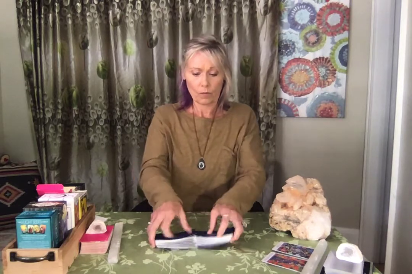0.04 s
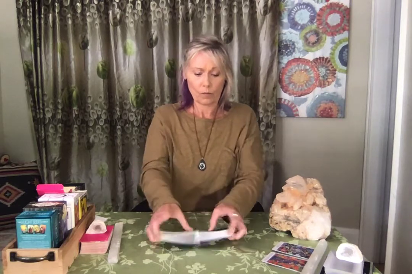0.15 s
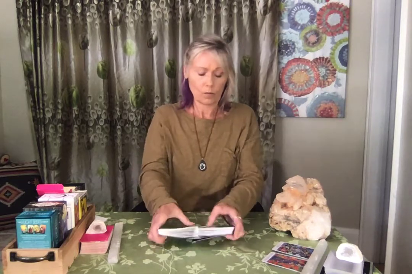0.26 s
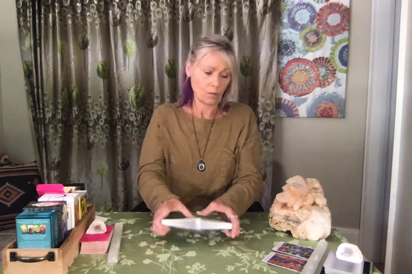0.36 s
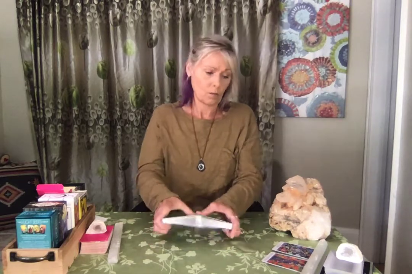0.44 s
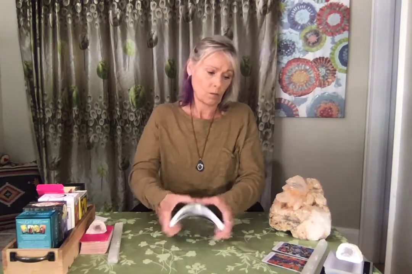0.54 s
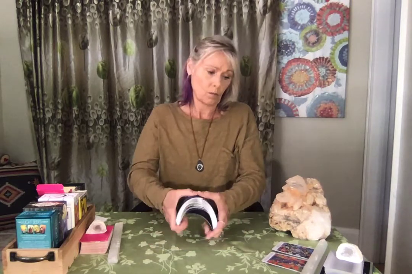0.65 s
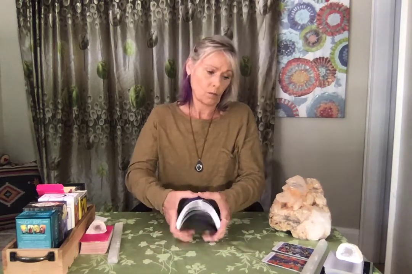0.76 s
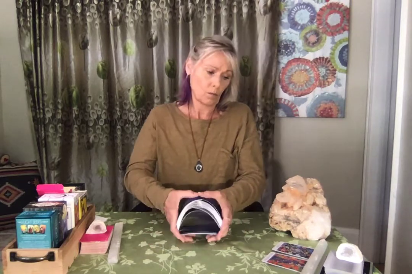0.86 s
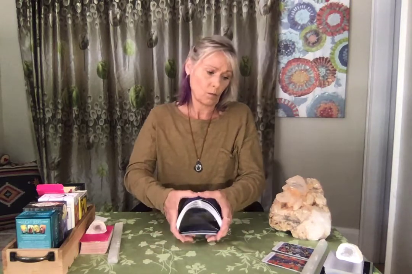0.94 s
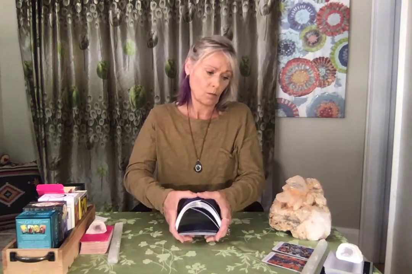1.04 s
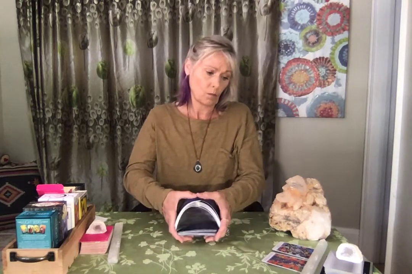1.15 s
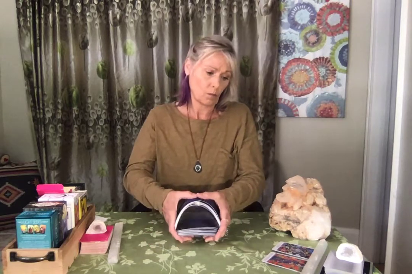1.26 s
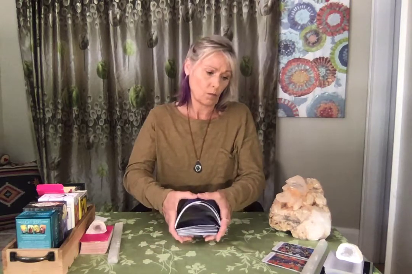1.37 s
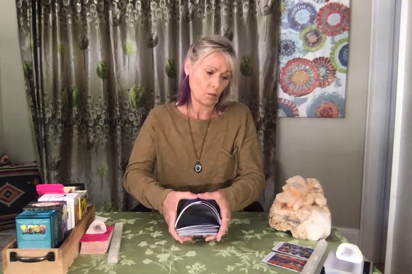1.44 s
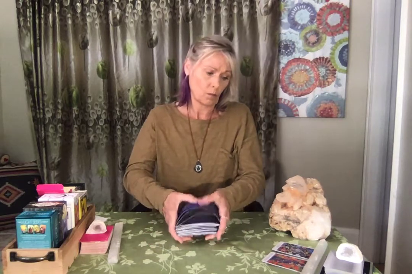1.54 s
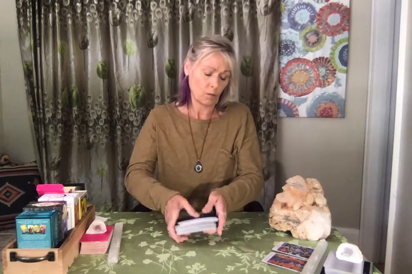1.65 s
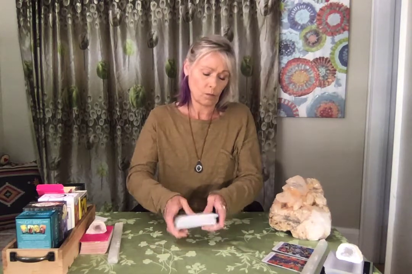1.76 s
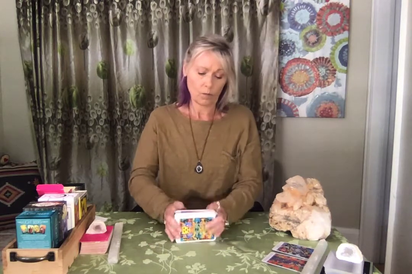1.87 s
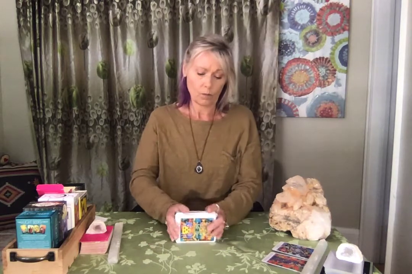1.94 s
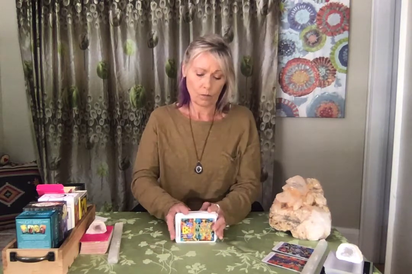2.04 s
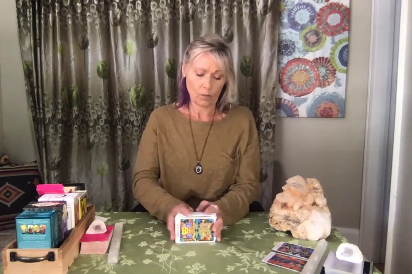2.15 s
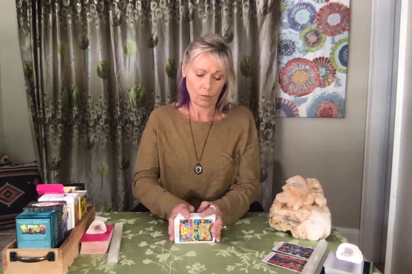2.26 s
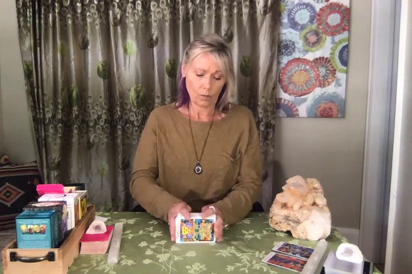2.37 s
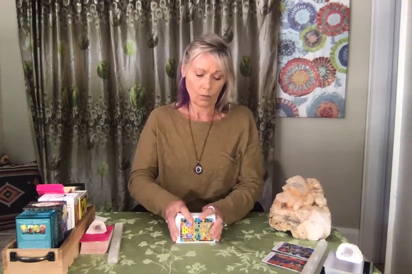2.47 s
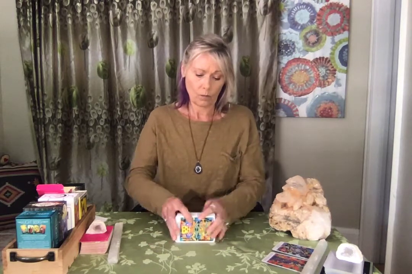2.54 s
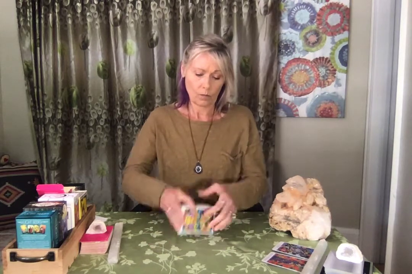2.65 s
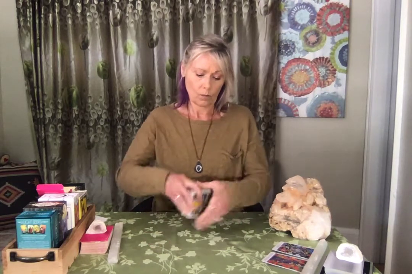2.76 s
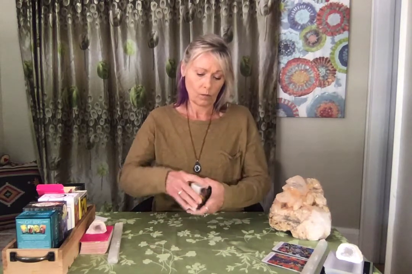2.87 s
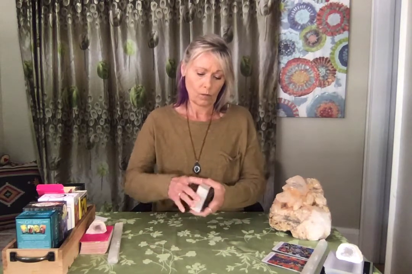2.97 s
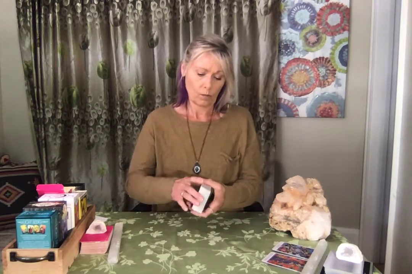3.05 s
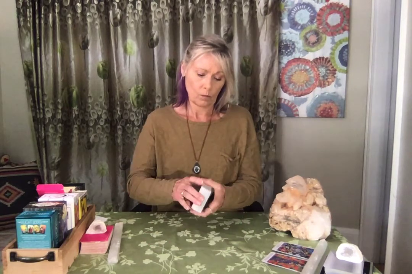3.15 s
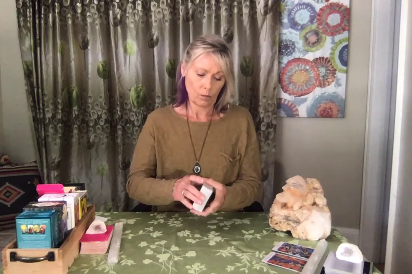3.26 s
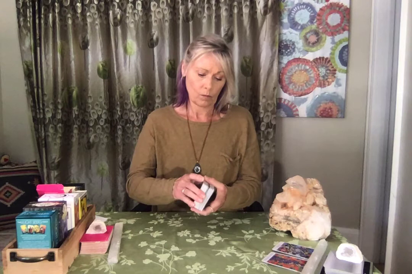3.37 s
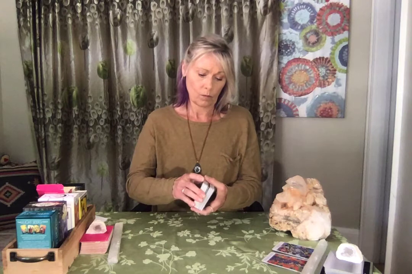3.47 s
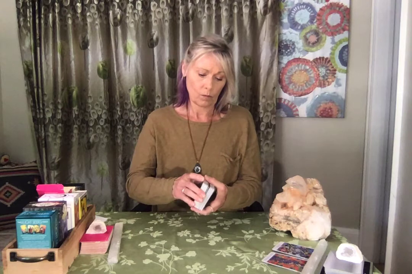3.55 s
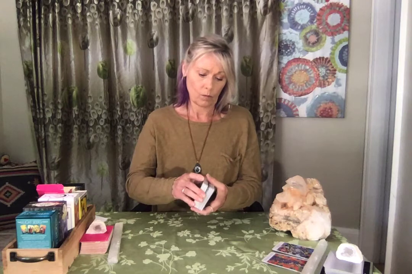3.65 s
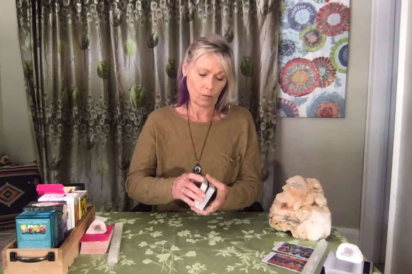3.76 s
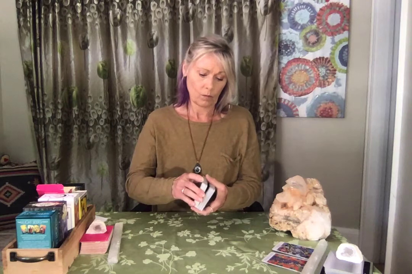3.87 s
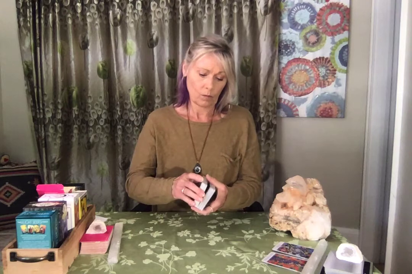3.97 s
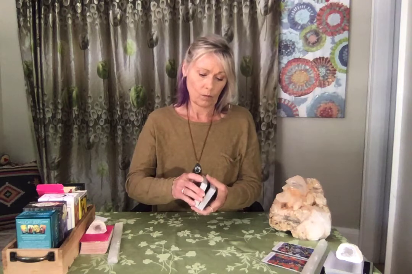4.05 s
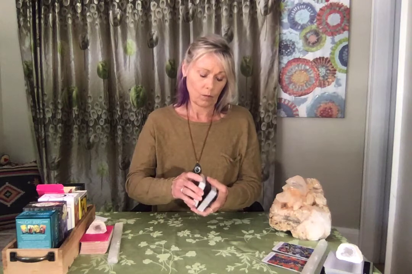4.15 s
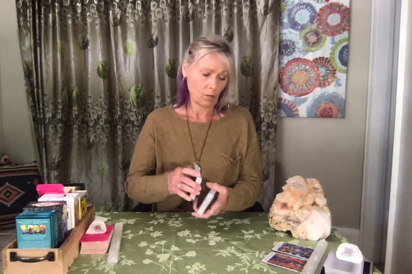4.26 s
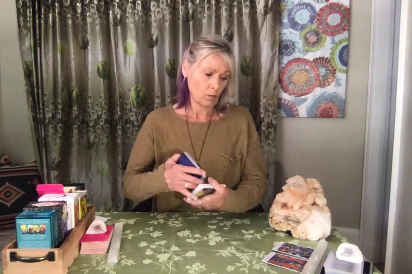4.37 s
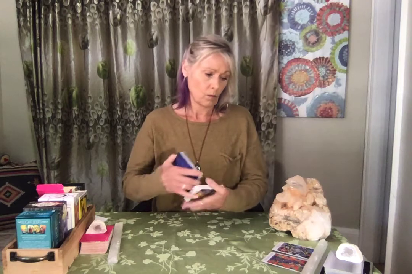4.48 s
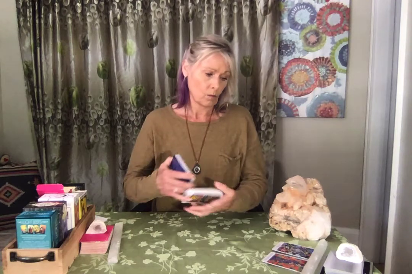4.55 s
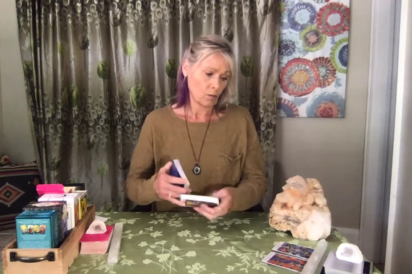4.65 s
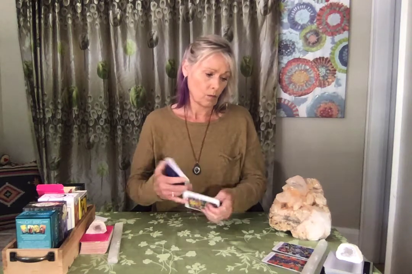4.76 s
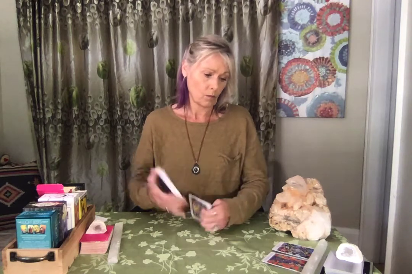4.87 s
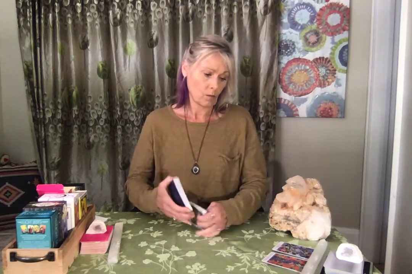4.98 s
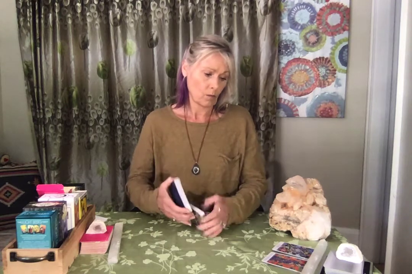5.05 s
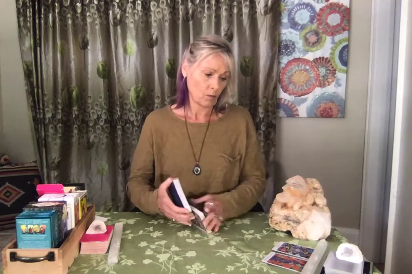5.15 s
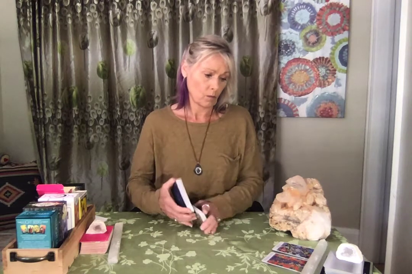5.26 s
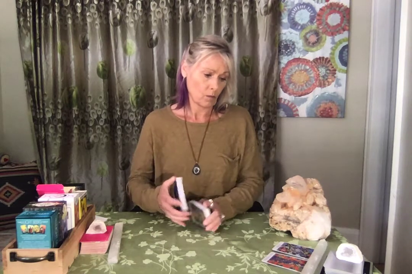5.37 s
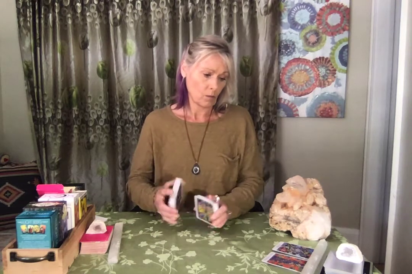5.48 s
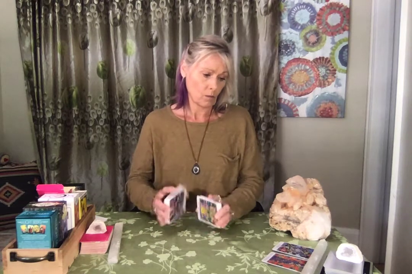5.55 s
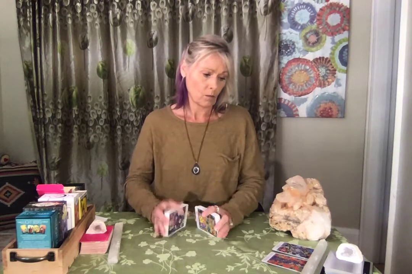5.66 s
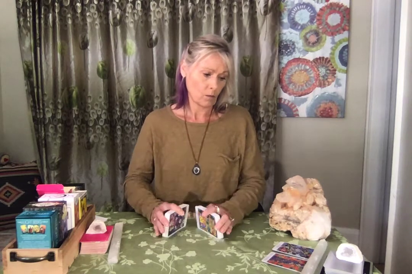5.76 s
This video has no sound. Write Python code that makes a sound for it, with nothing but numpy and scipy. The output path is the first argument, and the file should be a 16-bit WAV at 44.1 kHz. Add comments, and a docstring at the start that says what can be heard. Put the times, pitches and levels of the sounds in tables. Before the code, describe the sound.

A riffled deck bends, cascades with crisp snaps and slaps flat, followed by faint card strokes and dull table knocks over low room hum.

```python
"""Hands brush over large cards, then the riffled deck is bent into a bridge with a rising slide of card on card.
Let go, the cards cascade with a bright hiss, flutter and sharp snaps, squeal once and slap shut.
The deck is then squared and cut in soft strokes, and its halves are knocked on a cloth-covered table.
Filtered noise makes the sliding, short bursts the snaps, and decaying tones the ringing cards and table.
Throughout, a small curtained room holds mains hum and the soft rush of a fan."""
import sys
import numpy as np
from scipy import signal
from scipy.fft import rfft, irfft, next_fast_len
from scipy.io import wavfile

SR = 44100
rng = np.random.default_rng(int(sys.argv[2]) if len(sys.argv) > 2 else 0)


def dump(signal):
    """Clip the signal to [-1, 1] and save it as 16-bit WAV at the path in sys.argv[1]."""
    limited = np.clip(np.atleast_2d(signal).T, -1, 1)
    pcm = np.round(limited * 32767).astype(np.int16)
    wavfile.write(sys.argv[1], SR, pcm)


N = 256395
TIME = np.arange(N) / SR  # seconds

# card edges snapping free or landing, levels relative within each column:
# start_s, crack_db, face_slap_db, card_ring_db
SNAPS = [(0.849, -21, -48, -72), (0.8873, -18.5, -34.5, -60), (0.9326, -19.5, -31.5, -47),
         (0.9778, -15, -26, -53), (1.0077, -36, -33.5, -56), (1.0109, -28, -34, -56),
         (1.0852, -15.5, -42, -47), (1.1074, -35, -43, -38), (1.128, -24, -40, -49),
         (1.133, -22.5, -45, -51), (1.1763, -16.5, -38.5, -51), (1.2433, -37, -32, -59),
         (1.373, -33, -40.5, -50), (1.533, -26, -48, -47), (1.5554, -16, -39, -22.5),
         (1.5576, -20, -48, -45), (1.5718, -21, -56, -50), (1.577, -24, -40, -40),
         (1.605, -22, -39.5, -30.5), (1.614, -24, -43, -42), (1.640, -39, -39, -32.5)]
# the bridge falls flat and the halves mesh: middle_s, level_db, half_length_s
COLLAPSE = [(1.571, -43.5, 0.022), (1.622, -40, 0.033)]
# colour of a cracking card edge: pitch_hz, relative level_db (per Hz)
CRACK = [(500, -33), (1500, -27), (2900, -4), (3700, -3.5), (5000, -2), (8500, 6), (12000, 2), (16000, -2)]


def from_db(db):
    """Decibels to gain."""
    return 10 ** (np.asarray(db) / 20)


def rms_one(x):
    """Scale to an rms (average strength) of 1."""
    return x / np.sqrt(np.mean(x ** 2) + 1e-20)


def swell(s, half):
    """A smooth rise and fall of height 1."""
    return np.exp(-((TIME - s) / half) ** 2)


def held(start_s, end_s, attack_s, release_s):
    """Straight rise, hold, and a release of 20 dB per release time."""
    rise = np.clip((TIME - start_s) / attack_s, 0, 1)
    return rise * from_db(-20 * np.clip((TIME - end_s) / release_s, 0, 10))


def drift(per_s):
    """Slow random wandering of rms 1, with a new target so many times a second."""
    return rms_one(np.interp(TIME * per_s, np.arange(N), rng.standard_normal(N)))


def colour(x, spectrum):
    """Filter without pre-echo (minimum phase), of unit power gain; it falls steeply past the spectrum's ends."""
    size = next_fast_len(N + 8192, True)
    size += size % 2
    octave = np.log2(np.maximum(np.arange(size // 2 + 1) * SR / size, 1))
    pitch_hz, level_db = np.transpose(spectrum)
    knots = np.log2(pitch_hz)
    outside = np.minimum(np.abs(octave - np.clip(octave, knots[0], knots[-1])), 2)
    # 30 dB per octave past the ends, for at most two octaves
    gain = rms_one(from_db(np.interp(octave, knots, level_db) - 30 * outside))
    # folding the cepstrum forward in time gives the minimum phase
    cepstrum = irfft(np.log(gain))
    cepstrum[1:size // 2] *= 2
    cepstrum[size // 2 + 1:] = 0
    return irfft(rfft(x, size) * np.exp(rfft(cepstrum)))[:N]


def noise(spectrum):
    """Smooth noise of a given colour, rms 1."""
    return rms_one(colour(rng.standard_normal(N), spectrum))


def die_away(kicks, t60):
    """Every kick starts an exponential decay that drops 60 dB in t60 seconds."""
    return signal.lfilter([1], [1, -from_db(-60 / (t60 * SR))], kicks + 1e-18)


def kicks_at(times, db):
    """Single impulses at given times and levels."""
    return np.bincount(np.round(np.asarray(times) * SR).astype(int), from_db(db), N)[:N]


def bursts(times, db, t60, spike):
    """A sharp first contact, then a brief crackle that dies away."""
    kicks = kicks_at(times, db)
    return spike * kicks + die_away(kicks, t60) * rng.standard_normal(N)


def rattle(per_s, spread_db, t60, smooth):
    """Chance contacts of uneven size, each a short burst, over a share of smooth sliding; rms near 1."""
    born = rng.random(N) < per_s / SR
    sizes = from_db(abs(spread_db) * np.clip(rng.standard_normal(N), -2, 2))
    power = die_away(born * sizes ** 2, t60 / 2)
    share = np.clip(smooth, 0, 1)
    return rng.standard_normal(N) * np.sqrt(share + (1 - share) * power / power.mean())


def ring(push, modes):
    """Decaying tones side by side; neighbours move in opposite directions at the point struck."""
    out = np.zeros(N)
    for k, (hz, db, t60) in enumerate(modes):
        radius = from_db(-60 / (t60 * SR))
        angle = 2 * np.pi * hz / SR
        resonator = [1, -2 * radius * np.cos(angle), radius * radius]
        tone = signal.lfilter([0, np.sin(angle)], resonator, push + 1e-18)
        out += (-1) ** k * from_db(db) * tone
    return out


def cascade(flick_db, pile_db, pile_half_s):
    """Cards scrape off the bridge (hiss), flick free and flap on to the pile (flutter, strongest as it falls)."""
    # packets of cards that let go together: middle_s, extra_db, half_length_s
    packets = [(1.004, 5, 0.017), (1.29, 3, 0.012), (1.342, 5.5, 0.011), (1.399, 3.5, 0.0074),
               (1.444, 5.5, 0.01)]
    # the flow thins just before the bridge gives way: middle_s, level_db, half_length_s
    lull_s, lull_db, lull_half_s = (1.526, -7, 0.019)
    # colours of the scrape and of the flaps: pitch_hz, relative level_db (per Hz)
    scrape_spectrum = [(900, -35), (2500, -7), (3400, -14), (4300, -4), (5300, -6), (7000, 1), (8400, -0.5),
                       (9200, 0), (10000, 2), (12100, -1.5), (12800, 3), (16000, 0)]
    flap_spectrum = [(150, -39), (330, -6), (600, -10), (900, -8), (1300, -1.5), (1900, -15), (2500, -10),
                     (3500, -21), (7000, -23)]
    scrape_db, flap_db = -44, -53.5  # before packets and the fall add to them

    running = held(start_s=0.758, end_s=1.635, attack_s=0.027, release_s=0.034)
    surge_db = sum(db * swell(s, half) for s, db, half in packets)
    scrape = colour(rattle(per_s=360, spread_db=4.0, t60=0.022, smooth=0.6), scrape_spectrum)
    scrape += from_db(flick_db) * flicks(per_s=88, jitter=0.45, spread_db=4.0)
    flaps = colour(rattle(per_s=170, spread_db=3.0, t60=0.0061, smooth=0.39), flap_spectrum)
    falling_db = pile_db * swell(COLLAPSE[-1][0], pile_half_s)
    flow = from_db(scrape_db + surge_db) * scrape + from_db(flap_db + falling_db) * flaps
    lull = from_db(lull_db * swell(lull_s, lull_half_s))
    return running * lull * held_back(dip_db=-4.0, lead_s=0.0036, half=0.0046) * flow


def flicks(per_s, jitter, spread_db):
    """One small flick for each card, at a nearly even pace; rms 1."""
    pace = per_s * np.exp(jitter * drift(80))
    # a card leaves each time the running count reaches a whole number
    leaves = np.diff(np.floor(np.cumsum(pace) / SR), prepend=0)
    kicks = leaves * from_db(spread_db * np.clip(rng.standard_normal(N), -2, 1.5))
    crackle = die_away(kicks, t60=0.023) * rng.standard_normal(N)
    return rms_one(colour(3 * kicks + crackle, CRACK))


def held_back(dip_db, lead_s, half):
    """A card that catches holds up the flow just before it snaps free; gain over time."""
    s, crack = np.transpose(SNAPS)[:2]
    sizes = from_db(crack - crack.max())  # the strongest crack gives the full dip
    return from_db(dip_db * sum(size * swell(at - lead_s, half) for at, size in zip(s, sizes)))


def snaps(crack_db, slap_db, ring_db, rebound_s, rebound_db, tick_db):
    """An edge cracks and chatters twice in about two milliseconds; the card's face slaps the pile and rings."""
    # light ticks of card corners and nails: start_s, relative level_db
    ticks = [(0.0942, -54), (1.8716, -57), (4.692, -54.5), (4.7234, -65), (4.7671, -64), (4.7925, -61),
             (4.9705, -53.5), (5.3403, -58.5), (5.57, -50.5), (5.663, -57)]
    # colour of the face's slap: pitch_hz, relative level_db (per Hz)
    slap_spectrum = [(120, -5), (330, 12.5), (700, 2.5), (1300, 6), (2600, 1.5), (4000, -11.5), (9000, -25)]
    # a stiff card's brief ring: pitch_hz, relative level_db, t60_s (time to drop 60 dB)
    card_modes = [(1262, -15.5, 0.14), (2260, -7.5, 0.03), (2990, 0, 0.0086), (4480, -6, 0.018),
                  (5500, 1, 0.0038)]

    s, crack, slap, stiff = np.transpose(SNAPS)
    gaps = rebound_s * rng.uniform(.6, 1.4, (len(s), 3))
    contacts = np.cumsum(gaps, axis=1) - gaps[:, :1]  # the first contact comes at once
    edge = np.zeros(N)
    for k, late in enumerate(contacts.T):
        edge += bursts(s + late, crack + crack_db + k * rebound_db, t60=0.0065, spike=3.9)
    tick_s, tick = np.transpose(ticks)
    edge += bursts(tick_s, tick + tick_db, t60=0.051, spike=1.3)
    face = bursts(s + rebound_s, slap + slap_db, t60=0.015, spike=4.5)
    card_ring = ring(kicks_at(s + rebound_s, stiff + ring_db), card_modes)
    return colour(edge, CRACK) + colour(face, slap_spectrum) + card_ring


def collapse():
    """The last cards clatter together in a dense, fuller rush."""
    # colour of the meshing cards: pitch_hz, relative level_db (per Hz)
    mesh_spectrum = [(300, -6), (700, 4), (1300, 7), (2500, 2.5), (3600, -8), (4500, 1.5), (8000, 3),
                     (15000, -1.5)]
    level = sum(from_db(db) * swell(s, half) for s, db, half in COLLAPSE)
    clatter = rattle(per_s=600, spread_db=6, t60=.008, smooth=.25)
    return level * colour(clatter, mesh_spectrum)


def squeal(fall_hz_per_s, waver_hz):
    """Two cards stick and slip against each other: an unsteady tone that sags as the card slows."""
    # the squeal at its middle: pitch_hz, level_db (rms)
    hz, db = (1290, -39.5)
    middle_s, half_s = 1.4, .009
    pitch = hz - fall_hz_per_s * (TIME - middle_s) + waver_hz * drift(600)
    tone = np.sqrt(2) * np.sin(2 * np.pi * np.cumsum(pitch) / SR)
    return from_db(db) * tone * swell(middle_s, half_s)


def bend():
    """The interleaved cards slide ever faster as the bridge is bent, then stop: a thin, rising hiss."""
    # the bending slide: fastest_s, relative friction_db, rise_s, fall_s, relative top_db (above 10 kHz)
    bend_rows = [(.655, -49.5, 0.19, 0.018, -4)]
    # colour of its hiss: pitch_hz, relative level_db (per Hz)
    hiss_spectrum = [(1200, -15), (2600, -4), (3400, -9), (4300, -1.5), (5300, -5), (7000, 0), (9500, -1),
                     (12000, -7), (16000, -9)]
    return strokes(bend_rows, hiss_spectrum, smooth=0.6, level_db=2.0, bright_db=0.0)


def square_and_cut():
    """Hands and cards rub in separate soft strokes as the deck is handled, squared and cut."""
    # strokes: fastest_s, relative friction_db, rise_s, fall_s, relative top_db (above 10 kHz)
    stroke_rows = [ (.004, -52, 0.038, .065, -9), (.12, -67.5, 0.15, 0.24, -6),
                   (.262, -49.5, 0.043, 0.021, -2), (.356, -53, 0.047, 0.047, -2.5),
                   (1.832, -61.5, 0.028, 0.083, -5), (1.92, -55.5, 0.032, 0.051, 1),
                   (2.19, -55.5, 0.046, 0.044, -3), (2.47, -77, 0.29, .2, -6), (2.592, -65, .09, 0.077, -6),
                   (2.647, -73, .04, 0.02, 3), (2.853, -71.5, 0.028, 0.084, -6), (4.45, -74, .07, .12, -3),
                   (4.595, -63.5, 0.12, 0.096, 0), (4.73, -66, 0.14, 0.087, -7),
                   (4.79, -64.5, .05, 0.042, -10), (4.86, -71, .03, .05, -6), (4.952, -67, 0.023, .02, -18),
                   (5.022, -68, 0.046, .025, -1), (5.29, -73, 0.15, .14, -3),
                   (5.682, -65, 0.022, 0.046, -1), ]
    # colour of the rubbing: pitch_hz, relative level_db (per Hz)
    rub_spectrum = [(400, 4.5), (1500, -1), (2700, -2.5), (3400, -6.5), (4300, -2), (5300, -6),
                    (7000, -2.5), (9500, -3), (12000, -5.5), (16000, -5)]
    return strokes(stroke_rows, rub_spectrum, smooth=0.51, level_db=2.0, bright_db=1.5)


def strokes(rows, spectrum, smooth, level_db, bright_db):
    """Card slides on card and skin with a fine grain; each stroke swells, fades and has its own brightness."""
    rub = colour(rattle(per_s=750, spread_db=11, t60=0.059, smooth=smooth), spectrum)
    high_pass = signal.butter(3, 10000, "high", fs=SR, output="sos")
    top = signal.sosfiltfilt(high_pass, rub)
    body_power, top_power = np.zeros((2, N))
    for s, db, rise_s, fall_s, top_db in rows:
        gain = from_db(db + level_db) * slide(s, rise_s, fall_s)
        body_power += gain ** 2
        top_power += (gain * from_db(top_db + bright_db)) ** 2
    return np.sqrt(body_power) * (rub - top) + np.sqrt(top_power) * top


def slide(s, rise_s, fall_s):
    """Gain of a stroke that speeds up to its peak and slows again, by 20 dB in each of the two times."""
    away = np.clip(np.maximum((s - TIME) / rise_s, (TIME - s) / fall_s), 0, 5)
    roundness = 1.3  # 1 = a pointed peak, 2 = a bell
    return from_db(-20 * away ** roundness)


def knocks(level_db, thud_db):
    """Soft pushes ring the table: long contacts are dull, a hand's weight behind them stirs the deep modes."""
    # deck on the table: start_s, relative level_db, contact_s, weight_db (extra on the deep modes)
    hits = [(.980, -41, 0.0014, -7), (1.008, -49, 0.00097, -12), (1.243, -41.5, 0.0013, -4),
            (1.918, -42, .0012, 1.5), (1.931, -40.5, .0021, -2), (4.968, -36.5, 0.0016, 8.5),
            (5.024, -43, .0027, 9.5), (5.1, -47, 0.0048, -4), (5.663, -37, 0.0011, -23),
            (5.668, -30, 0.0011, -4.5), (5.692, -40.5, 0.0029, 11.5)]
    # table under its cloth, five deep modes first: pitch_hz, relative level_db, t60_s (time to drop 60 dB)
    table_modes = [(126.8, -7, 0.18), (154, -9, 0.11), (212.4, -8.5, 0.072), (234.6, -13.5, 0.15),
                   (286, -17.5, 0.1), (406.5, 0, 0.099), (560, -23, .1), (682.4, -10.5, 0.17),
                   (820, -22, 0.081)]
    # colour of the settling cards' thud: pitch_hz, relative level_db (per Hz)
    thud_spectrum = [(90, -4.5), (180, 10.5), (450, -12.5), (900, -8.5)]
    # the deck settles after each knock: later, quieter and with a longer contact
    settle_s, settle_db, settle_softer = .0233, -8.5, 1.35

    settling = [(s + settle_s, db + settle_db, contact * settle_softer, weight_db)
                for s, db, contact, weight_db in hits]
    pushes = hits + settling
    light, heavy = np.zeros((2, N))
    for s, db, contact, weight_db in pushes:
        pulse = np.sin(np.pi * np.clip((TIME - s) / contact, 0, 1)) ** 2
        light += from_db(db) * pulse / pulse.sum()
        heavy += from_db(db + weight_db) * pulse / pulse.sum()
    s, db, contact, weight_db = np.transpose(pushes)
    # the loose cards settle with a short thud
    thud = colour(bursts(s, db + weight_db + thud_db, t60=0.1, spike=1), thud_spectrum)
    table_ring = ring(heavy, table_modes[:5]) + ring(light, table_modes[5:])
    return from_db(level_db) * table_ring + thud


def room(x, t60, wet_db):
    """Direct sound and a short diffuse tail that begins with the nearest surfaces, 4 ms later."""
    t = np.arange(SR // 2) / SR
    tail = rng.standard_normal(len(t)) * from_db(-60 * t / t60) * (t > .004)
    return x + from_db(wet_db) * signal.fftconvolve(x, tail / np.linalg.norm(tail))[:N]


def mains_hum():
    """Steady low tones whose phase wavers a little."""
    # hum tones: pitch_hz, level_db (rms)
    hum_tones = [(60, -50), (112.5, -72), (215, -79.5), (431, -70)]
    hum = np.zeros(N)
    for hz, db in hum_tones:
        waver = 0.0015 * hz * drift(4.1)  # radians
        hum += from_db(db) * np.sqrt(2) * np.sin(2 * np.pi * (hz * TIME + rng.random()) + waver)
    return hum


def fan():
    """Moving air heard as a low rush plus a fainter hiss, both steady coloured noise."""
    # colours of the rush and of the hiss: pitch_hz, relative level_db (per Hz)
    rush_spectrum = [(47, -31.5), (80, -13), (85, -14), (119, -1), (182, -12), (215, -6.5), (329, -13),
                     (438, -15), (478, -17), (563, -16.5), (664, -18), (1100, -16.5), (1430, -46),
                     (2420, -120)]
    hiss_spectrum = [(900, -16), (1100, -5), (1260, 2), (1480, -4), (1900, -14), (2600, -16.5), (3250, -24),
                     (4100, -25), (5300, -32.5), (7000, -34), (11000, -38.5), (16000, -42)]
    rush_db, hiss_db = -54, -59.5  # rms
    return from_db(rush_db) * noise(rush_spectrum) + from_db(hiss_db) * noise(hiss_spectrum)


def table_rumble():
    """Resting arms make the table rumble faintly, and more so while the hands lean on it."""
    # hands lean on the table: start_s, end_s, level_db (rms, added to the resting rumble's gain)
    leans = [(0.047, .6, -59), (1.945, 2.65, -57.5), (5.0, 5.3, -61), (5.68, 5.81, -58)]
    resting_db, ramp_s = -65, 0.054  # rms under resting arms; time to put weight on or take it off
    weight = from_db(resting_db)
    for start_s, end_s, db in leans:
        weight = weight + from_db(db) * held(start_s, end_s, ramp_s, ramp_s)
    # pitch_hz, relative level_db (per Hz)
    return weight * noise([(15, 4.5), (27, -6.0), (38, -10), (90, -17.5)])


def scene():
    """Cards and table in the room, over the hum, fan and rumble."""
    cards = cascade(flick_db=-11, pile_db=11, pile_half_s=0.049)
    cards += snaps(crack_db=-14.5, slap_db=-1.5, ring_db=-3.5, rebound_s=.0008, rebound_db=-3, tick_db=-5.5)
    cards += collapse()
    cards += squeal(fall_hz_per_s=4000, waver_hz=49.4)
    cards += bend()
    cards += square_and_cut()
    table = knocks(level_db=0.5, thud_db=-11)
    background = mains_hum() + fan() + table_rumble()
    return (room(cards, t60=0.35, wet_db=-9) + room(table, t60=0.28, wet_db=-7.5) + background)[None]


def record(dry):
    """The top is cut steeply above 15.9 kHz."""
    low_pass = signal.ellip(12, .2, 80, 15900, fs=SR, output="sos")  # order, ripple dB, stop dB, Hz
    return signal.sosfilt(low_pass, dry)


dry = scene()
out = record(dry)
dump(out)
```